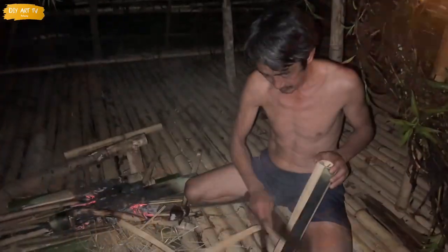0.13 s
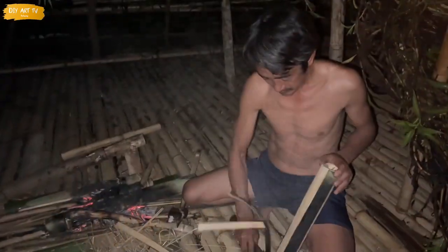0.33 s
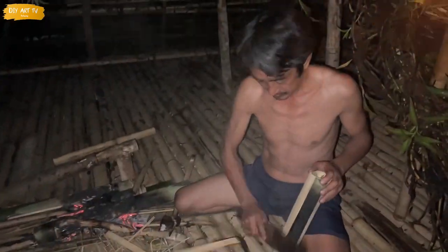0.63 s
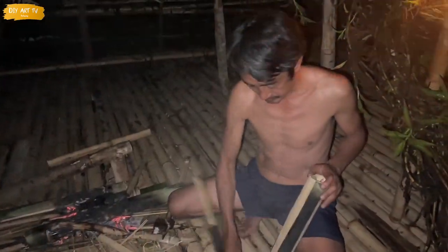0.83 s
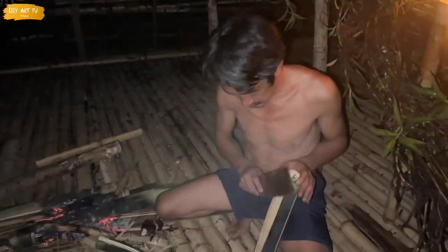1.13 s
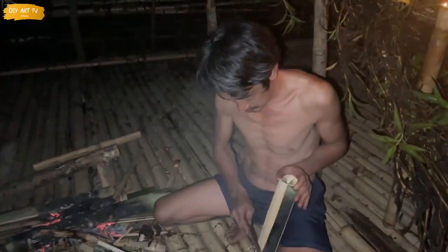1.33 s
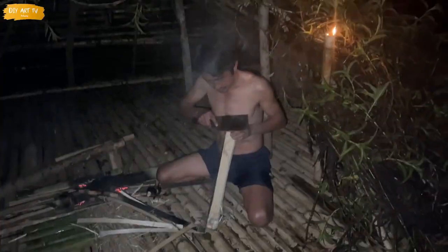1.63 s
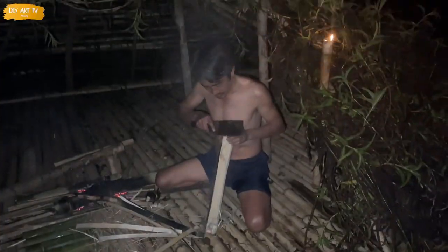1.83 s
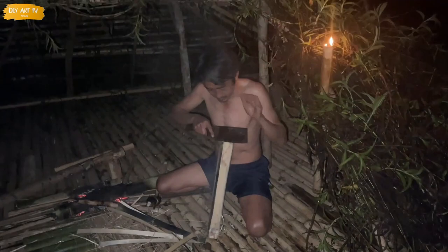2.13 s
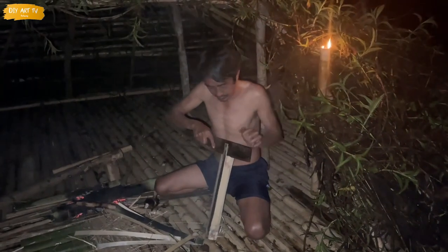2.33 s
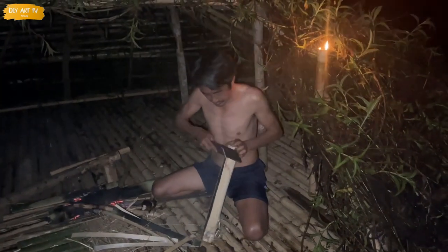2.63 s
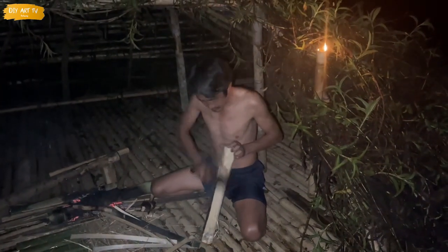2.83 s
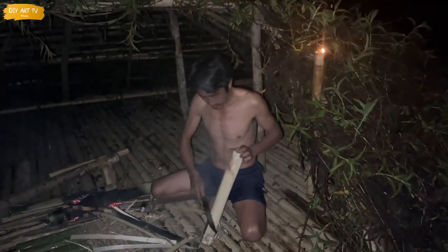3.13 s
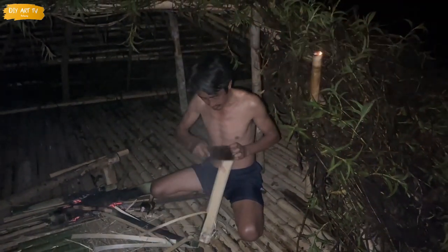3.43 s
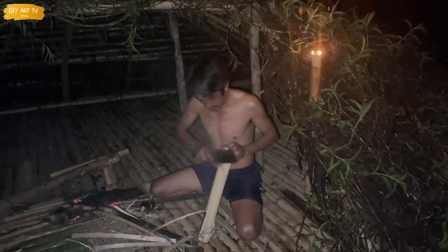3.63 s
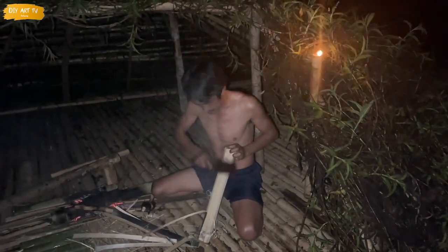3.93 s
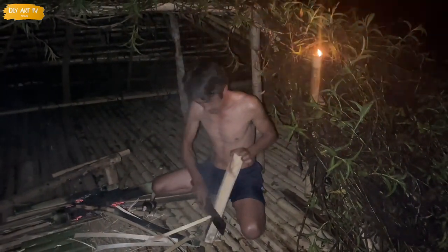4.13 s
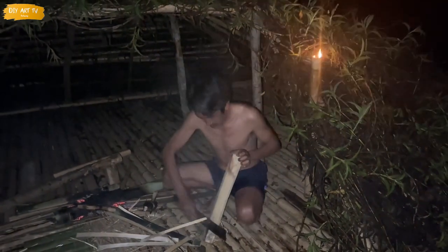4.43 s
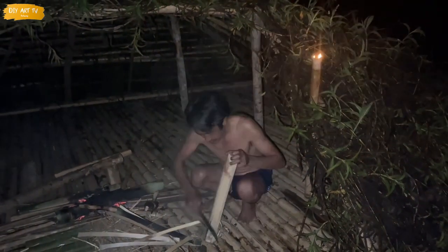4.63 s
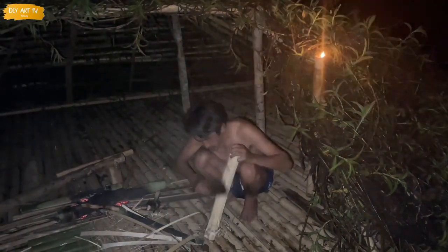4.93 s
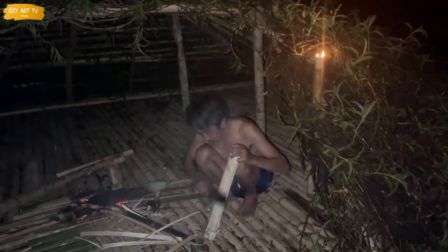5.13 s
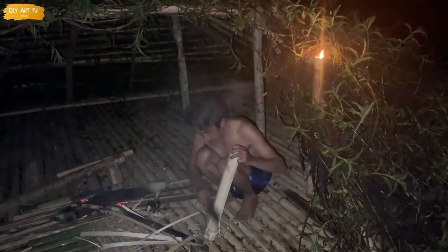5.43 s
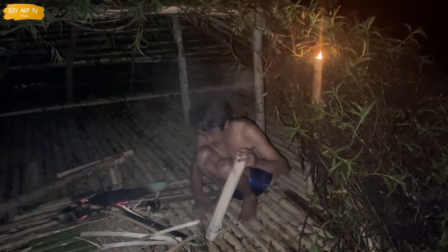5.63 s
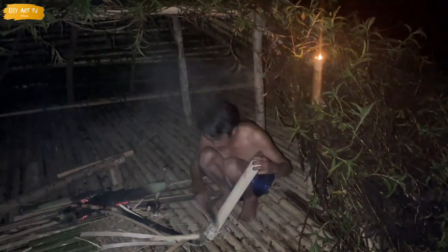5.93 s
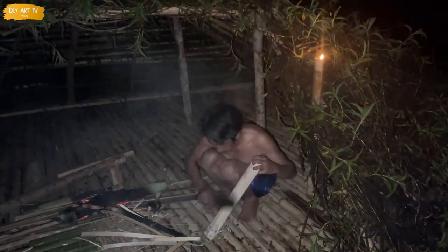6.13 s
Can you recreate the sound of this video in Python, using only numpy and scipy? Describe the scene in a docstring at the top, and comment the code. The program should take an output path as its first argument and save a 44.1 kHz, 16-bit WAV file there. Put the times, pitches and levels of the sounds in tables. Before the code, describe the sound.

At night in an open shelter, sharp woody bamboo clacks, soft floor thuds, faint blade scrapes and ember snaps sound over steady high insect trill.

```python
"""On a floor of bamboo slats in an open shelter, beside a small wood fire at night, bamboo is cut and laid down.
Knocks are dispersive bending waves with decaying modes; the springy slats thud as damped low modes.
A blade scrapes as filtered stick-slip noise, embers snap as short coloured bursts, a few metallic rings sound.
Behind them the floor rumbles, shavings rustle and the fire hisses, all as shaped noise.
Insects and distant night calls are narrow bands of noise that waver."""
import sys
import numpy as np
from scipy import signal
from scipy.fft import rfft, irfft
from scipy.io import wavfile
from scipy.ndimage import uniform_filter1d

SR = 44100
rng = np.random.default_rng(int(sys.argv[2]) if len(sys.argv) > 2 else 0)


def output_pcm(signal):
    """Save a mono or channel-first signal as 16-bit PCM at the path in sys.argv[1].

    Samples are clipped to [-1, 1] before scaling.
    """
    pcm = np.clip(np.atleast_2d(signal).T, -1, 1) * 32767
    wavfile.write(sys.argv[1], SR, np.round(pcm).astype(np.int16))


N = 277830

# rumble of the floor, following how much weight moves on it: t/s, relative level/dB
RUMBLE_LEVEL = [(0, -49), (.27, -50.5), (.42, -39), (.65, -49), (1.55, -49), (1.8, -51), (2.42, -44),
                (2.7, -53.5), (3.25, -59.5), (4.0, -59), (4.5, -47.5), (4.92, -52.5), (5.1, -42),
                (5.6, -46), (5.85, -49.5), (6.15, -42)]
# left-right likeness of surrounding sounds: f/Hz, likeness (0 to 1)
DIFFUSE_LIKENESS = [(60, .6), (300, .6), (700, .4), (1400, 0), (3500, 0), (7000, .3), (15000, .4)]


def amp(db):
    """Decibel law: twenty decibels are a factor of ten in amplitude."""
    return 10 ** (np.asarray(db) / 20)


def evened(x):
    """Normalisation to unit root-mean-square amplitude."""
    return x / np.sqrt(np.mean(x ** 2) + 1e-20)


def read(points, hz):
    """Linear interpolation of a spectrum on a log-frequency axis."""
    f, value = np.transpose(points)
    return np.interp(np.log(hz + 1), np.log(f + 1), value)


def add(mix, s, sound):
    """Superposition: a sound starting at s seconds is summed into the mix."""
    part = mix[:, round(s * SR):][:, :sound.shape[-1]]
    part += sound[..., :part.shape[1]]


def dying(t, t60):
    """Exponential decay, falling 60 dB in t60 seconds."""
    return np.exp(-np.log(1000) * t / t60)


def noise(size, colour_db, likeness=None):
    """Mid-side synthesis: stereo noise of rms 1 with a given spectrum and left-right likeness."""
    # likeness of near sounds, the default: f/Hz, likeness (0 to 1)
    near_likeness = [(50, .88), (250, .97), (1000, .92), (4000, .7), (16000, .65)]
    hz = np.fft.rfftfreq(size, 1 / SR)
    mid, side = rfft(rng.standard_normal((2, size)))
    same = np.clip(read(near_likeness if likeness is None else likeness, hz), 0, 1)
    side = side * np.sqrt((1 - same) / (1 + same))
    left_right = np.array([mid + side, mid - side])
    return evened(irfft(left_right * amp(colour_db(hz)), size))


def wander(size, hz):
    """Low-passed noise: a random fluctuation of rms 1 with a Gaussian roll-off at scale hz."""
    f = np.fft.rfftfreq(size, 1 / SR)
    return evened(irfft(rfft(rng.standard_normal(size)) * np.exp(-(f / hz) ** 2), size))


def mottle(x, depth_db, frames, bins):
    """Time-frequency modulation: random patches of the spectrum swell and sink."""
    z = signal.stft(x, SR, nperseg=256, noverlap=192)[2]
    patches = rng.standard_normal(z.shape[1:])
    patches = uniform_filter1d(patches, bins, 0)
    patches = uniform_filter1d(patches, frames, 1)
    z = z * amp(depth_db * evened(patches))
    return evened(signal.istft(z, SR, nperseg=256, noverlap=192)[1][:, :x.shape[1]])


def grit(size, colour, per_s, spread_db):
    """Shot noise: sparse clicks of uneven size, coloured and brought to rms 1."""
    happens = rng.random(size) < per_s / SR
    sizes = amp(spread_db * np.minimum(rng.exponential(1, size), 3))
    clicks = happens * rng.choice([-1, 1], size) * sizes
    return evened(irfft(rfft(clicks) * amp(read(colour, np.fft.rfftfreq(size, 1 / SR))), size))


def resonate(x, hz, width):
    """A one-pole resonance of unit peak gain, heterodyned along the frequency curve hz."""
    turn = np.exp(2j * np.pi * np.cumsum(hz) / SR)
    r = np.exp(-np.pi * width / SR)
    return 2 * (turn * signal.lfilter([1 - r], [1, -r], x / turn)).real


def far_calls(chorus_db=-78, patchy_db=5.5):
    """Band-limited noise under slow amplitude modulation: distant night calls come and go."""
    # bands of the chorus: centre f/Hz, relative level/dB
    call_bands = [(1500, -7), (1850, -4.5), (2130, 3), (2700, -2.5)]
    out = np.zeros((2, N))
    for centre, db in call_bands:
        band = noise(N, lambda hz: -20 * np.log10(1 + ((hz - centre) / 190) ** 4), DIFFUSE_LIKENESS)
        out += band * amp(chorus_db + db + patchy_db * wander(N, 8))
    return out


def insects(throb=0.27, swell_db=2, drift=.008):
    """Incoherent addition: many callers blur into narrow bands, modulated in frequency and amplitude."""
    # groups: centre f/Hz, relative spread/Hz, relative level/dB, mean pulse rate/(1/s)
    groups = [(3800, 40, -62, 82), (3903, 81, -62.5, 68), (4075, 100, -67, 39), (9070, 290, -73, 25)]
    out = np.zeros((2, N))
    for centre, spread, db, rate in groups:
        song = noise(N, lambda hz: -20 * np.log10(1 + ((hz - centre) / (1.3 * spread)) ** 4), DIFFUSE_LIKENESS)
        shift_turns = np.cumsum(drift * centre * wander(N, 9)) / SR
        song = (signal.hilbert(song) * np.exp(2j * np.pi * shift_turns)).real
        pulse_turns = np.cumsum(rate * (1 + .15 * wander(N, 7.9))) / SR
        pulsed = evened(song * (1 + throb * np.sin(2 * np.pi * pulse_turns)))
        out += amp(db + swell_db * wander(N, 20)) * pulsed
    return out * amp([[.5], [-.5]])  # a little stronger on the left


def air_hiss(hiss_db=-58.5, flicker_db=2.5):
    """Broadband turbulence noise: the soft hiss of the fire and night air flickers in patches."""
    # spectrum of the hiss: f/Hz, relative level/dB
    air_colour = [(300, 7.5), (900, -11.5), (1400, -5.5), (2000, -1), (2600, -9), (3400, -4), (4300, -3.5),
                  (5000, -0.5), (5900, -14), (7500, -7.5), (9200, -1), (10700, -5), (12500, -0.5),
                  (16000, -3)]
    hiss = noise(N, lambda hz: read(air_colour, hz), DIFFUSE_LIKENESS)
    return amp(hiss_db) * mottle(hiss, flicker_db, 40, 3)


def floor_rumble(lumps_db=2):
    """Low-frequency structural noise: the floor rumbles in proportion to the weight moving on it."""
    # spectrum of the rumble: f/Hz, relative level/dB
    rumble_colour = [(15, -52), (25, -33), (72, 6.5), (124, 10.5), (279, -10), (361, -25.5), (401, -19),
                     (517, -27), (557, -26), (619, -48), (900, -43.5), (1170, -67), (1980, -120)]
    rumble = noise(N, lambda hz: read(rumble_colour, hz), DIFFUSE_LIKENESS)
    weight = amp(np.interp(np.arange(N) / SR, *np.transpose(RUMBLE_LEVEL)))
    return rumble * weight * amp(lumps_db * wander(N, 33) + 1.5)


def brushing(rise_s=0.045, release_s=0.084, fade_db_per_s=-9):
    """An amplitude envelope: each brush through the shavings rises quickly, slackens and stops."""
    # brushes: start t/s, length t/s, relative level/dB
    brushes = [(0, 0.088, -46), (0.324, 0.37, -57), (0.844, 0.35, -53.5), (1.429, 0.31, -61.5),
               (4.53, 0.433, -56), (4.961, 0.6, -61.5), (5.742, 0.75, -59.5)]
    t = np.arange(N) / SR
    envelope = np.zeros(N)
    for s, length, db in brushes:
        rise = np.clip((t - s) / rise_s, 0, 1)
        release = np.clip((s + length - t) / release_s, 0, 1)
        envelope += rise * release * amp(db + fade_db_per_s * np.clip(t - s, 0, length))
    return envelope


def rustle(grain_db=2, rattle_db=6.0, swish_db=-3, debris_db=-3):
    """Friction noise plus shot noise: shavings and strips swish while small debris clicks."""
    # spectrum of the shavings: f/Hz, relative level/dB
    shavings_colour = [(200, 0), (450, 0.5), (1000, -5.5), (2000, -10.5), (4000, -11), (9000, -19),
                       (15000, -29.5)]
    swish = noise(N, lambda hz: read(shavings_colour, hz), DIFFUSE_LIKENESS)
    swish = mottle(swish, rattle_db, 14, 2)
    debris = grit(N, shavings_colour, per_s=250, spread_db=4)
    shavings = amp(swish_db) * swish + amp(debris_db) * debris
    return shavings * brushing() * amp(grain_db * wander(N, 120) - 1.0)


def snap(db, tilt_db, t60=0.023, ring_db=1, ring_hz=2280, scatter=0.14, scatter_tilt_db=-3, rise=0.00048):
    """Impulsive gas release: a pocket bursts with a crack, a short ring of the stick, a duller scatter."""
    # spectrum of a snap: f/Hz, relative level/dB
    snap_colour = [(300, -25), (1000, -8), (1600, -11), (2300, -6), (3200, -6), (4500, -6), (7000, -11.5),
                   (11000, -14.5), (15500, -14)]
    t = np.arange(SR // 8) / SR

    def colour(hz, tilt):
        return read(snap_colour, hz) + tilt * np.log2((hz + 100) / 3000)

    crack = noise(len(t), lambda hz: colour(hz, tilt_db))
    behind = noise(len(t), lambda hz: colour(hz, tilt_db + scatter_tilt_db))
    # thin, bright snaps hardly shake the stick
    ring = amp(ring_db - 7.1 * max(tilt_db, 0)) * np.sin(2 * np.pi * ring_hz * t)
    burst = (crack + ring) * dying(t, t60) + scatter * behind * dying(t, 0.12)
    return amp(db + 5.5) * (1 - np.exp(-t / rise)) * burst


def ember_snaps():
    """Superposition of separate bursts in the embers."""
    # snaps: t/s, relative level/dB, treble tilt/(dB per octave)
    snaps = [(0.443, -41, 9), (.461, -50, 5), (.469, -31.5, 6.5), (.491, -46, 8), (0.515, -44.5, 8),
             (.974, -51.5, -4), (1.2424, -33, -0.5), (1.397, -40, -4), (1.49, -51.5, -5),
             (1.551, -32.5, -2.6), (1.662, -43.5, 0), (2.541, -46.5, 4.5)]
    out = np.zeros((2, N))
    for s, db, tilt_db in snaps:
        add(out, s, snap(db, tilt_db))
    return out


def thud(db, hz, t60=0.099, rise=0.0045, chatter_db=-12, chatter_t60=0.053):
    """Damped flexure: a softly loaded slat sways in a low mode, with a dull bump and woody chatter."""
    t = np.arange(SR // 4) / SR
    bump_colour = [(30, -26.5), (90, 3.0), (200, 7), (380, -15), (600, -30.5), (1500, -73), (5000, -92)]
    chatter_colour = [(100, -30), (260, 3), (400, -0.5), (650, -22), (1200, -41), (4000, -80)]
    bump = noise(len(t), lambda f: read(bump_colour, f)) * dying(t, 0.074)  # neighbouring slats
    chatter = noise(len(t), lambda f: read(chatter_colour, f)) * dying(t, chatter_t60)
    sway = np.sin(2 * np.pi * hz * t) * dying(t, t60)
    body = 1.43 * sway + 0.85 * bump + amp(chatter_db) * chatter
    return amp(db) * (1 - np.exp(-(t / rise) ** 2)) * body


def floor_thuds(settle_per_s=6, settle_db=4, settle_hz=129.24, spread_db=5.0):
    """Excitation by load: slats thud under each press and settle at random, harder when more weight moves."""
    # thuds as the blade is pressed home and weight shifts: t/s, relative level/dB, f/Hz
    presses = [(0.122, -36.5, 120), (0.244, -38, 88), (0.327, -12.5, 139), (0.362, -27, 93),
               (0.533, -31.5, 115), (1.233, -35.5, 109), (1.471, -35.5, 114), (1.785, -28.5, 135.5),
               (1.887, -30.5, 142), (2.02, -31.5, 132.5), (2.074, -34, 119), (2.155, -33.5, 110.4),
               (2.254, -27.5, 103.8), (2.386, -25.5, 137), (2.411, -23, 106), (2.435, -26, 80),
               (2.521, -27.5, 106), (2.639, -35.5, 124), (2.694, -39.5, 279), (2.803, -35.5, 94),
               (3.099, -41, 136), (3.268, -41, 136), (3.355, -38.5, 129), (4.536, -42, 96),
               (4.719, -33.5, 145), (5.264, -26, 105), (5.625, -23.5, 101), (6.04, -30.5, 108)]
    out = np.zeros((2, N))
    for s, db, hz in presses:
        add(out, s, thud(db, hz))
    for when, strength, pitch in rng.random((int(settle_per_s * N / SR), 3)):
        s = when * N / SR
        db = np.interp(s, *np.transpose(RUMBLE_LEVEL)) + settle_db + spread_db * (2 * strength - 1)
        add(out, s, thud(db, settle_hz * 2 ** pitch))  # up to an octave above settle_hz
    return amp(0.5) * out


def metallic_rings():
    """Free damped vibration: brief metallic rings, each a decaying sinusoid."""
    # rings: t/s, f/Hz, level/dB, t60/s
    tinks = [(.324, 9724, -15.5, 0.0065), (.622, 6530, -60.5, 0.25), (1.32, 2040, -53, 0.15)]
    out = np.zeros((2, N))
    t = np.arange(SR // 3) / SR
    for s, hz, db, t60 in tinks:
        add(out, s, amp(db) * np.sin(2 * np.pi * hz * t) * dying(t, t60))
    return out


def scrape(length, db, tilt_db, body_db, start_hz, fibres_db=3.5, grain_db=0.5, end_hz=480, width=450,
           splinters_db=-7):
    """Stick-slip friction: fibres catch and slip; the strip's resonance sinks as its free length grows."""
    # spectrum of the rubbing: f/Hz, relative level/dB
    rub_colour = [(200, 3.5), (450, -3), (800, -9.5), (1300, -4), (1700, -2), (3500, -10.5), (6500, -12.5),
                  (9000, -13.5), (12000, -15.5), (14500, -11), (16000, -13)]
    size = int(length * SR)
    rub = noise(size, lambda hz: read(rub_colour, hz) + tilt_db * np.log2((hz + 100) / 3000))
    rub = mottle(rub, fibres_db, 16, 2)
    rub = rub + amp(splinters_db) * grit(size, rub_colour, per_s=500, spread_db=5.5)
    pitch = np.geomspace(start_hz, end_hz, size)
    body = resonate(resonate(rub, pitch, width), pitch, width)
    body = evened(body) * np.sqrt(np.linspace(0, 2, size))  # grows along the stroke
    slips = evened(amp(grain_db * wander(size, 310)))
    return slips * (amp(db) * rub + amp(body_db) * body) * signal.windows.tukey(size, .7)


def blade_scrapes():
    """Superposition of separate frictional strokes along the bamboo."""
    # strokes: start t/s, length t/s, relative level/dB, treble tilt/(dB per octave),
    # relative level of the strip resonance/dB, its starting f/Hz
    strokes = [(1.277, 0.057, -45.5, 0, -69, 2400), (2.817, 0.15, -49.5, 2.8, -56.5, 1073),
               (3.63, 0.2, -53, 1.2, -65.5, 1700), (4.038, 0.069, -53.5, 3, -70, 2000),
               (4.91, 0.19, -52.5, 3.6, -68, 1500)]
    out = np.zeros((2, N))
    for s, *stroke in strokes:
        add(out, s, scrape(*stroke))
    return out


def knock_strength(clack_db, thud_db, crack_db, hz):
    """Spectral balance of an impact: thud in the bass, clack in the middle, crack in the treble."""
    return read([(300, thud_db), (750, clack_db), (1900, clack_db), (5500, crack_db)], hz)


def slat_ring(hz, db, cycles=32):
    """Free damped vibration: the struck slat rings briefly at its own pitch."""
    t = np.arange(SR // 4) / SR
    ring = np.sin(2 * np.pi * hz * t) * dying(t, cycles / np.sqrt(hz * 400))
    return amp(db) * ring * (1 - np.exp(-t * hz))


def knock(clack_db, thud_db, crack_db, contact, t60=0.071, lag_cycles=0.82, damping=0.14, travel=0.00279,
          direct_db=-1, scatter_db=-2):
    """Dispersion: a bending wave runs along the bamboo, treble first; the tube rings, loose slats answer."""
    # modes of the struck bamboo: f/Hz, relative level/dB, t60/s
    modes = [(198, 5, .075), (253, -1, .06), (401, 1, .1), (595, -1, .09), (808, -15, .1), (920, -7, .07),
             (1129, -11, .07), (1338, -12, .06), (1478, -4, .05), (1650, -9, .04), (1820, -8, .04),
             (1966, -10, .06), (2240, -13, .05), (2641, -16, .06), (3020, -10, .04), (3176, -7, .04)]
    # spectrum of a knock: f/Hz, relative level/dB
    knock_colour = [(90, -15.5), (180, -2), (350, 0.5), (700, -3.5), (1400, -5.5), (2800, -7.5),
                    (5000, -4.5), (8000, -11.5), (14000, -6.5)]
    t = np.arange(16384) / SR
    hz = np.fft.rfftfreq(len(t), 1 / SR) + 1

    def strength(f):
        return amp(knock_strength(clack_db, thud_db, crack_db, f) + read(knock_colour, f))

    scatter = np.zeros((2, len(t)))
    for centre in 100 * 2 ** (np.arange(12) * 2 / 3):
        band = noise(len(t), lambda f: -np.minimum(36 * np.log2((f + 1) / centre) ** 2, 90))
        rise = contact + lag_cycles / centre
        band *= 1 - np.exp(-(t / rise) ** 2)
        band *= dying(t, t60 * (1000 / centre) ** damping)  # t60 holds at 1 kHz
        scatter += strength(centre) * band / np.sqrt((band ** 2).mean(0).sum() / (0.0071 * SR))

    # only a hard, short contact launches a clean pulse
    pulse = strength(hz) * SR * np.sqrt(0.0049 / hz)
    pulse = pulse / (1 + (120 / hz) ** 4) / (1 + (contact / 0.0019) ** 2)
    ring = sum(amp(db) * np.cos(2 * np.pi * f * t) * dying(t, decay) for f, db, decay in modes)
    # the ring grows faster than the clack: only hard blows wake the tube
    ring *= amp(2 + 1.5 * clack_db) * (1 - np.exp(-t / (contact + 0.00033)))
    dispersion = np.exp(-4j * np.pi * travel * np.sqrt(1000 * hz))  # delay falls with the root of frequency
    wave = irfft((amp(direct_db) * pulse + rfft(ring)) * dispersion)
    fade = np.cos(.5 * np.pi * t / t[-1]) ** 2
    return amp(scatter_db) * scatter + wave * fade


def bamboo_knocks(slat_db=9.5, slat_growth=1.18):
    """Impact excitation: each blow launches a wave in the bamboo and, 2 ms later, a ring of the slat."""
    # blows: t/s, relative clack, thud and crack level/dB, contact time t/s, struck slat f/Hz
    blows = [(0.037, -38.5, -49.5, -44.5, .0004, 533), (0.3236, -25, -31, -27, 0.0021, 844),
             (.330, -20.5, -22, -25, 0.0024, 406), (0.558, -44, -48, -46.5, 0.0051, 499),
             (0.787, -32, -34, -32, 0.0033, 257), (.801, -10.5, -17, -16.5, 0.000057, 587),
             (0.842, -34.5, -36, -62, .0009, 1124), (.866, -49, -57, -72, .0018, 1963),
             (1.126, -55, -54, -68, .003, 925), (1.319, -48, -43.5, -68, 0.0028, 800),
             (2.232, -45.5, -50, -45, 0.0032, 1050), (4.090, -41, -48, -37.5, 0.001, 2020),
             (4.107, -41, -37.5, -68, .003, 571), (4.379, -45.5, -44.5, -43, 0.0062, 688),
             (4.407, -47.5, -40.5, -71.5, .002, 418), (4.495, -43, -64, -49.5, 0.00089, 920),
             (4.596, -48.5, -43.5, -54, 0.0019, 410), (4.619, -38.5, -60, -48.5, 0.0031, 1320),
             (4.677, -38.5, -43, -54, 0.0011, 668), (5.2011, -42, -26.5, -82, .0011, 313.5),
             (5.322, -43, -36, -42.5, .003, 612), (5.342, -39.5, -37.5, -51.5, 0.0031, 478),
             (5.622, -28.5, -25, -32, 0.0033, 213), (5.6443, -34, -32, -37.5, 0.00061, 2730),
             (5.65, -25, -32.5, -54, 0.00066, 995), (5.785, -43.5, -63, -76, 0.00099, 1016),
             (5.851, -48.5, -56.5, -77, .0016, 963), (6.021, -45, -56, -49, .0014, 1280),
             (6.134, -42, -53, -48, 0.0026, 1010), (6.214, -44, -49, -36, 0.0056, 1900)]
    out = np.zeros((2, N))
    for s, clack_db, thud_db, crack_db, contact, slat_hz in blows:
        add(out, s, knock(clack_db, thud_db, crack_db, contact))
        blow_db = knock_strength(clack_db, thud_db, crack_db, slat_hz)
        add(out, s + .002, slat_ring(slat_hz, slat_db + slat_growth * blow_db))
    return out


def shelter(x):
    """Reverberation: the open shelter returns sparse echoes, each band decaying at its own rate."""
    # reverberation: f/Hz, t60/s
    room_decay = [(125, 0.38), (300, .6), (800, 0.32), (2000, 0.38), (5000, 0.37), (14000, 0.083)]
    taps = rng.standard_normal((2, SR)) * (rng.random((2, SR)) < .08)
    taps[:, :SR // 100] = 0  # no echo in the first 10 ms
    hz, t, z = signal.stft(taps + .5 * taps[::-1], SR, nperseg=256)
    tail = signal.istft(z * dying(t, read(room_decay, hz)[:, None]), SR, nperseg=256)[1]
    return signal.fftconvolve(x.mean(0)[None], tail / np.linalg.norm(tail[0]), axes=1)[:, :N]


def scene():
    """Superposition of background, floor, fire and work; the shelter reverberates the near sounds."""
    background = far_calls() + insects() + air_hiss() + floor_rumble() + rustle()
    near = ember_snaps() + metallic_rings() + blade_scrapes() + bamboo_knocks()
    return background + floor_thuds() + near + amp(-25.5) * shelter(near)


def record(dry):
    """Linear filtering and saturation: treble leans left, deep bass is shed, peaks round off, a band limit."""
    # left channel over right: f/Hz, level difference/dB
    left_over_right = [(1500, 0), (4400, 2.5), (8000, 4), (14000, 2)]
    balance_db = read(left_over_right, np.fft.rfftfreq(N, 1 / SR)) * [[.5], [-.5]]
    balanced = irfft(rfft(dry) * amp(balance_db), N)
    lean = signal.sosfilt(signal.butter(3, 50, "high", fs=SR, output="sos"), balanced)
    band_limit = signal.firwin(511, 16100, window=("kaiser", 9), fs=SR)  # low-pass at 16.1 kHz
    return signal.oaconvolve(np.tanh(lean), band_limit[None], "same")


dry = scene()
out = record(dry)
output_pcm(out)
```